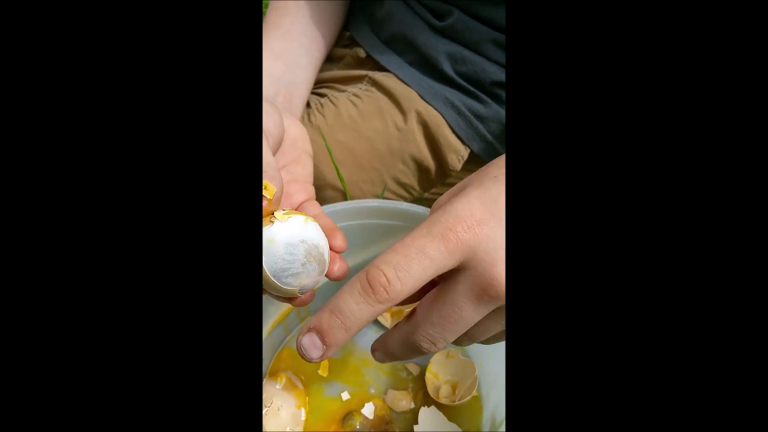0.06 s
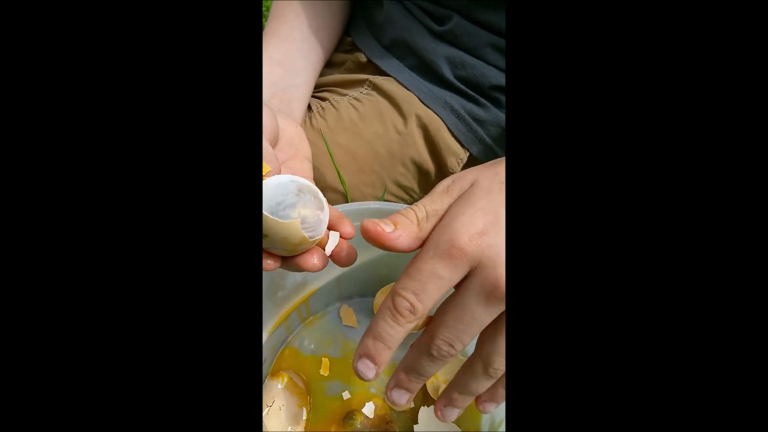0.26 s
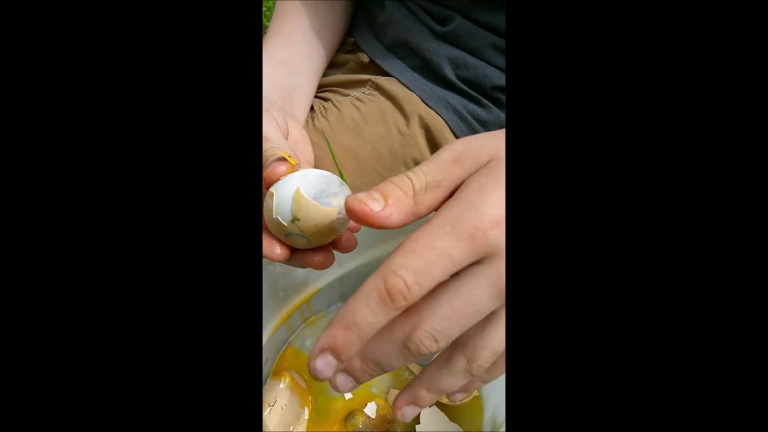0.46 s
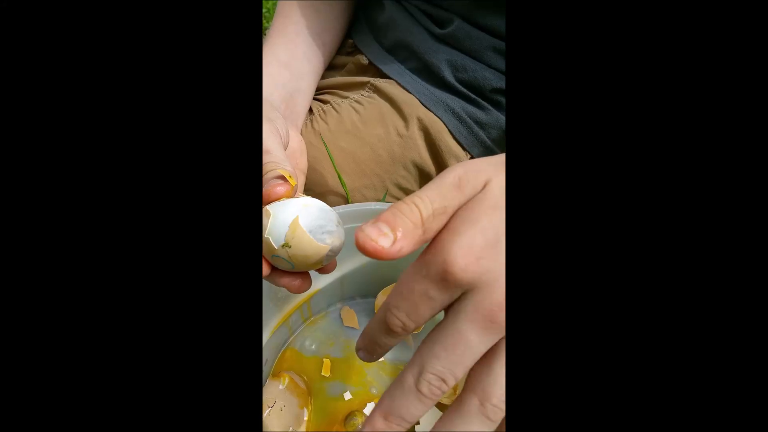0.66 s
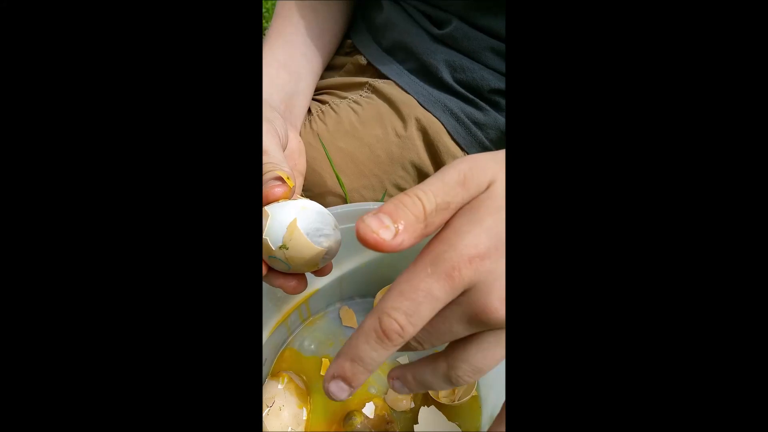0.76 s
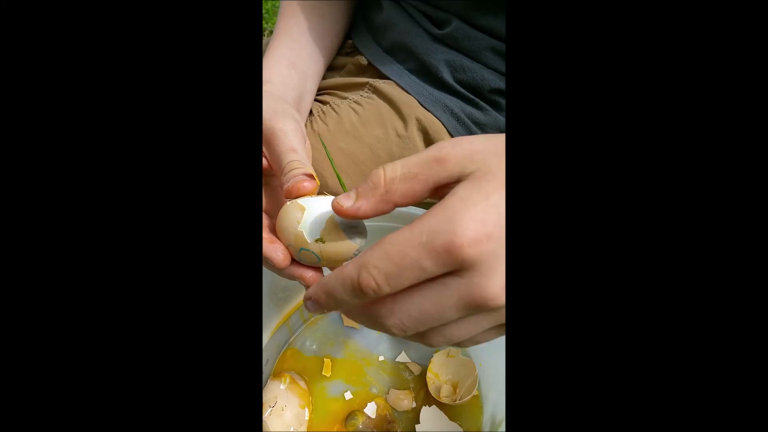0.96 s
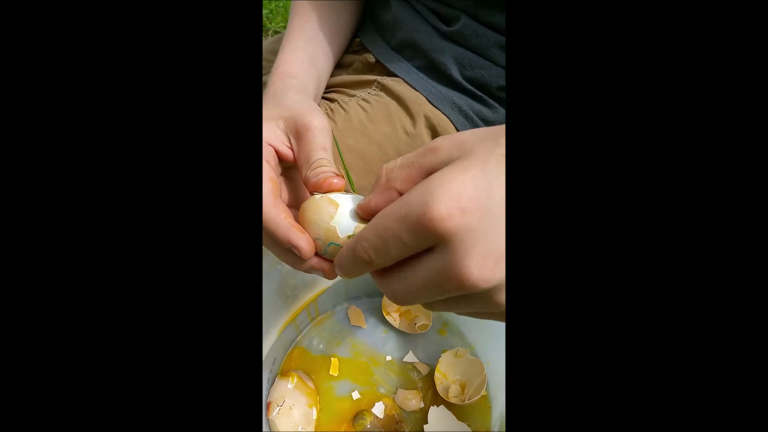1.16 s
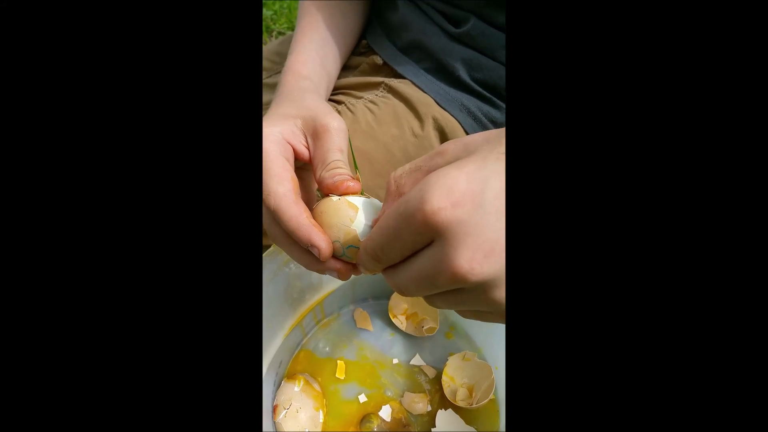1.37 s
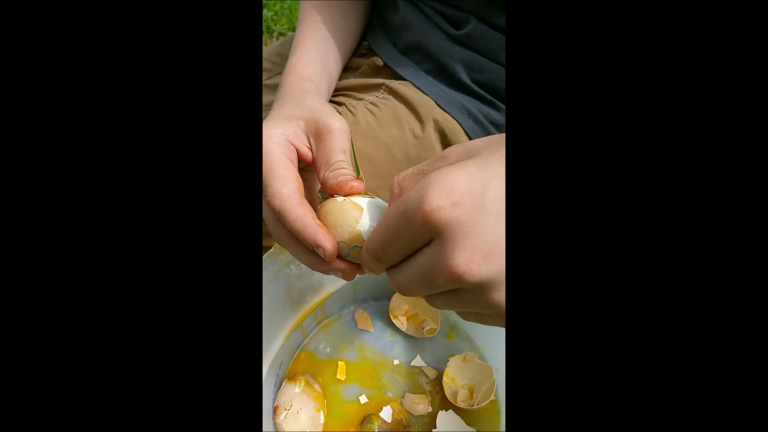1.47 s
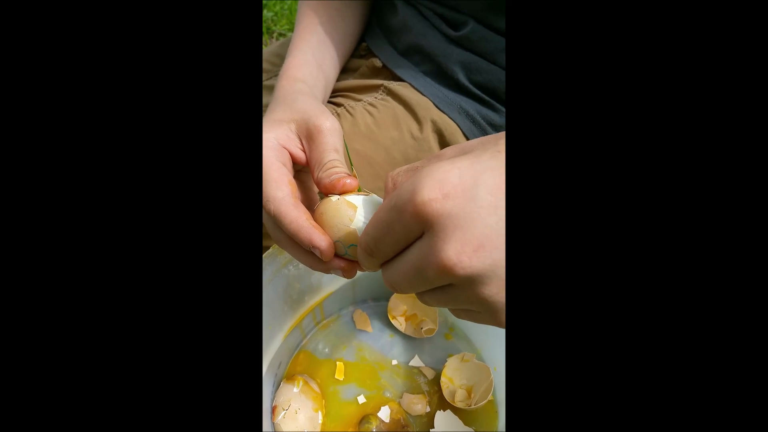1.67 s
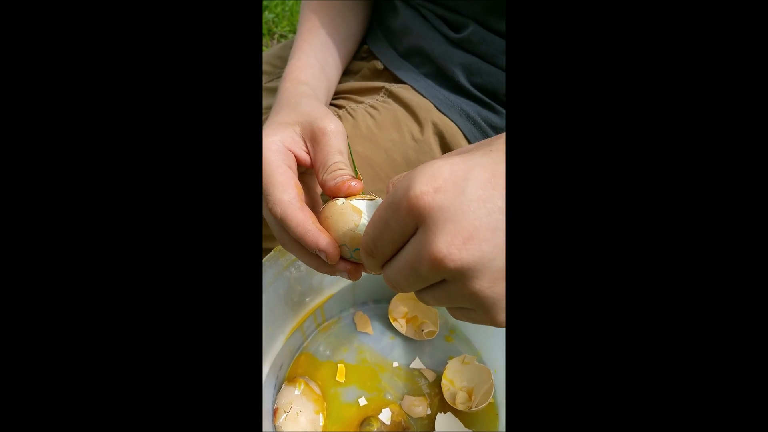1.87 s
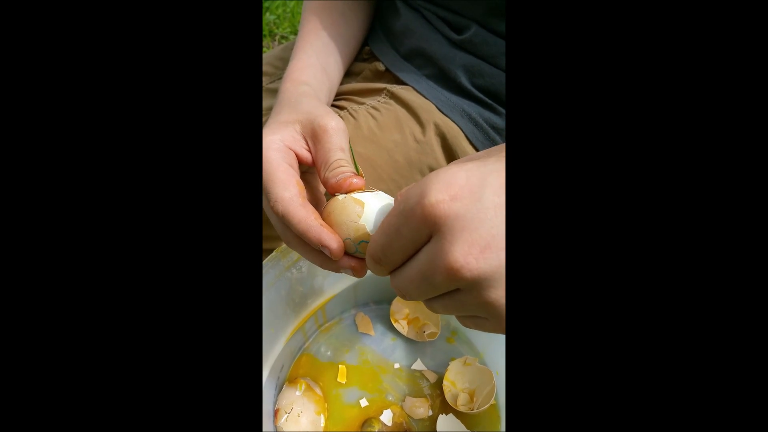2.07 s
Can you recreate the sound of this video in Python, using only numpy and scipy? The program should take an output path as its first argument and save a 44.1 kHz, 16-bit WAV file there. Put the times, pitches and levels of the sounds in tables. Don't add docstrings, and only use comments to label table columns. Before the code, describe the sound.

Egg peeling, very close and dry. At 0.23 s a shell piece hits a hollow plastic bucket with a loud double knock, then bounces and rattles more faintly until about 0.55. At 0.9 a flake tears off in a sharp brittle crackle, followed by sparse faint ticks to 1.5. Finer, brighter cracks come from 1.86 to 2.1. Far behind: low engine rumble, rustling leaves, faint bird chirps, one slight squeak around 0.7.

```python
import sys
import numpy as np
from scipy import signal
from scipy.fft import rfft, irfft
from scipy.io import wavfile
from scipy.ndimage import uniform_filter1d

SR = 44100
rng = np.random.default_rng(int(sys.argv[2]) if len(sys.argv) > 2 else 0)


def to_linear_factor(level_db):
    exponent = np.asarray(level_db, float) / 20
    return 10 ** exponent


def master(y):
    cut = np.clip(np.atleast_2d(y).T, -1, 1)
    pcm = np.round(cut * 32767)
    wavfile.write(sys.argv[1], SR, pcm.astype(np.int16))


N = 92610
HZ = np.fft.rfftfreq(N, 1 / SR)
BOTH_SIDES = np.array([[1], [-1]])


def curve(table, hz):
    table = np.array(table)
    return np.interp(np.log(np.maximum(hz, 1)), np.log(table[:, 0]), table[:, 1])


def ring(modes, phase=0., size=3000):
    hz, db, t60 = np.array(modes, float).T[:, :, None]
    t = np.arange(size) / SR
    decay = np.exp(-np.log(1000) * t / t60)
    return (to_linear_factor(db) * np.sin(2 * np.pi * hz * t + phase) * decay).sum(0)


def push(size):
    contact_s = 0.00021
    return 1 - np.exp(-np.arange(size) / SR / contact_s)


def walk(rate_hz):
    k = int(SR / rate_hz)
    steps = np.repeat(rng.standard_normal(N // k + 1), k)
    w = uniform_filter1d(uniform_filter1d(steps, k), k)[:N]
    return w / w.std()


def bell(centre_hz, width_hz):
    return np.exp(-.5 * ((HZ - centre_hz) / width_hz) ** 2)


def band(shape):
    x = irfft(rfft(rng.standard_normal((2, N))) * shape, N)
    return x / x.std()


def add(out, start_s, x):
    i = int(start_s * SR)
    out[:, i:i + x.shape[1]] += x[:, :N - i]


def peak(x, db):
    return x * to_linear_factor(db) / np.abs(x).max()


def pair(shape):
    alike = .93 / (1 + (HZ / 580) ** 2)
    mid, side = rfft(rng.standard_normal((2, N))) * shape * np.sqrt([1 + alike, 1 - alike])
    left = (mid + side) * to_linear_factor(0.757 * alike)
    right = (mid - side) / to_linear_factor(0.78 * alike)
    return irfft(np.array([left, right]), N)


# pitch_hz, level_db (per Hz)
AIR_SPECTRUM = [(20, -15), (100, -4), (200, -13.5), (330, -18.5), (800, -23.5), (2500, -33), (7000, -34.5),
                (8200, -39), (16500, -36)]
# pitch_hz, width_hz, level_db
ENGINE_DRONES = [(80.74, 28, -66.5), (130.6, 9.9, -69.5), (168.3, 4.8, -74), (284, 11, -76), (428, 12, -77),
                 (470, 29, -78.5)]


def air():
    out, top_hz, level_db = 0, 15900, -63.5
    for centre in 22 * 2 ** np.arange(0, 10.):
        octave = np.cos(np.pi / 2 * np.log2(np.maximum(HZ, 1) / centre).clip(-1, 1))
        shape = octave * (HZ < top_hz) * to_linear_factor(curve(AIR_SPECTRUM, HZ))
        out = out + pair(shape) * to_linear_factor(0.54 * walk(2.97))
    out = out * to_linear_factor(level_db) / out.mean(0).std()
    for hz, width_hz, db in ENGINE_DRONES:
        drone = pair(bell(hz, width_hz))
        out = out + drone * to_linear_factor(db + 1.83 * walk(3.42)) / drone.mean(0).std()
    return out


# time_s, level_db
LEAF_SWELL = [
    (0.0, -74.5),
    (1.98, -80),
    (2.1, -93),
]


def leaves():
    hump_hz, width_octaves = 2200, 0.67
    rustle = band(np.exp(-.5 * (np.log2(np.maximum(HZ, 1) / hump_hz) / width_octaves) ** 2))
    swell_db = np.interp(np.arange(N) / SR, *np.array(LEAF_SWELL).T)
    return rustle * to_linear_factor(swell_db - 0.5)


# pitch_hz, level_db, t60_s
SHELL_MODES = [(2100, -8, 0.0055), (2500, -4, 0.015), (3220, -4, 0.00491), (3770, -2.5, 0.00367),
               (4592, -4.5, 0.0012), (5300, 3, 0.0034), (6000, -3.5, 0.0045), (7070, 3.5, 0.0044),
               (7650, -7.5, 0.004), (8950, 4, 0.0058), (10160, 3, 0.0033), (11500, 3, 0.003),
               (13500, -4, 0.0062), (15140, -6.5, 0.00505)]


def snaps(burst_s, tilt_db):
    t = np.arange(800) / SR
    loudness_db = 8.5 * rng.standard_normal(800).clip(-2, 1.5)
    size = rng.standard_normal(800) * to_linear_factor(loudness_db) * (rng.random(800) < 0.27)
    size[0] = 5
    grit = 0.086 * np.exp(-t / 0.0026)
    burst = size * (np.exp(-(t / max(burst_s, .0002)) ** 2) + grit)
    modes = np.array(SHELL_MODES, float)
    modes[:, 0] *= 1 + .05 * rng.standard_normal(len(modes))
    octaves = np.log2(modes[:, 0] / modes[0, 0])
    modes[:, 1] += 4 * rng.standard_normal(len(modes)) + tilt_db * octaves
    turn = (1 + 0.33 * rng.standard_normal((len(modes), 1))) * -.5 * np.pi / 2
    return np.array([np.convolve(burst, ring(modes, p, size=700)) for p in (turn, -turn)])


# pitch_hz, level_db, t60_s
BUCKET_MODES = [(534,0.5,0.027),(1106.4,1.5,0.024),(1785,-9.5,0.019),(2068,-18,0.023),(2538,-8.5,0.019),(2990,-18,0.027),(3210,-12.5,0.0092),(3660,-17.5,0.029),(782,-8.5,0.015),(407,-10.5,0.011),(635,-6.5,0.026),(926,-5,0.015),(1450,-11.5,0.016)]
# start_s, peak_db, deep_modes_db, rattle_db
BOUNCES = [(0.2289,-8.5,8,-2),(0.2318,-25,-9,6.5),(.2410,-6,-8.5,-8),(.2450,-16.5,8,3.5),(.3447,-33,-2,-1),(0.3539,-23.5,-10.5,-4.5),(0.3651,-20,-7.5,1.5),(0.3788,-33,-17,-2.5),(.3950,-42,0,0),(.4030,-28,0.5,-7.5),(.4052,-33.5,-22,1),(.4180,-36.5,-1,-15),(0.4235,-33.5,-1.5,-23.5),(.4350,-33,-10,-2),(0.441,-38,-1,-6),(.4695,-40.5,4,-30),(0.4971,-46.5,0,-30),(0.5092,-44,10,-32),(0.5231,-52.5,-7,-28),(.535,-55.5,-4,-26),(0.546,-54,-27,-24)]


def drops():
    out = np.zeros((2, N))
    rocking, thud = (159.5, -7, 0.041), (300, -20.5, 0.014)
    for start_s, db, deep_db, rattle_db in BOUNCES:
        modes = np.array(BUCKET_MODES + [rocking, thud])
        modes[[0, -6, -5, -2, -1], 1] += deep_db - 2.5
        modes[:, 0] *= 1 + 0.029 * rng.standard_normal(len(modes))
        modes[2:, 1] += 3 * rng.standard_normal(len(modes) - 2)
        turn = 0.32 * rng.standard_normal((2, len(modes), 1)) * modes[:, :1] / 1100
        wall = -np.array([ring(modes, p) * push(3000) for p in turn])
        add(out, start_s, peak(wall, db))
        add(out, start_s, peak(snaps(0.002, -0.5), db + rattle_db))
    return out


# start_s, length_s, rms_db, tilt_db (per octave)
GRINDING = [(.2395, 0.003, -35, 11), (0.346, 0.052, -48, -13), (0.388, 0.066, -55.5, -18),
            (0.872, 0.0062, -72.5, -0.5), (0.8967, 0.012, -41.5, -5.5), (0.917, 0.0082, -50.5, -5),
            (0.9291, 0.011, -47.5, -24), (1.8642, 0.012, -40, 26), (1.882, 0.007, -57, 8.5),
            (1.904, 0.018, -71, -1), (2.037, .004, -68, 0), (2.053, 0.01, -72, -5),
            (2.065, 0.014, -50.5, -4.5), (2.08, 0.015, -53.5, 1.5), (2.091, 0.0085, -54.5, 5)]


def crunch():
    out = np.zeros((2, N))
    low_modes = [(1160, -14.5, 0.014), (1520, -2, 0.0056)]  # Hz, dB, t60 s
    for start_s, length_s, db, tilt_db in GRINDING:
        hit, loudness, chance = rng.standard_normal((3, int(length_s * SR)))
        grit = hit * to_linear_factor(1.5 * loudness) * (np.abs(chance) < .3)
        grit = grit * np.sin(np.pi * np.linspace(0, 1, len(grit)) ** 0.41).clip(0) ** .9
        modes = np.array(low_modes + SHELL_MODES) * [1, 1, 0.68]
        modes[:, 1] += tilt_db * np.log2(modes[:, 0] / 2000)
        turn = (1 + .3 * rng.standard_normal((len(modes), 1))) * -.5 * np.pi / 2
        x = np.array([np.convolve(grit, ring(modes, p, size=500)) for p in (turn, -turn)])
        add(out, start_s, x * to_linear_factor(db) / x.std())
    return out


# start_s, length_s, from_hz, to_hz, level_db
CHIRPS = [
    (1.70, .02, 5050, 5450, -79),
    (1.72, .015, 5650, 6000, -80),
    (1.693, .027, 3900, 3950, -81),
    (1.765, .014, 5200, 5500, -81),
    (1.778, .02, 5500, 4750, -78),
    (.572, .025, 4150, 4150, -79),
    (1.964, .018, 5350, 5200, -80),
    (1.59, .03, 5500, 4300, -83),
    (1.57, .02, 3600, 3100, -83),
]


def birds():
    out = np.zeros((2, N))
    for start_s, length_s, from_hz, to_hz, db in CHIRPS:
        n = int(length_s * SR)
        phase = 2 * np.pi * np.cumsum(np.linspace(from_hz, to_hz, n)) / SR
        tone = np.sin(phase) * np.hanning(n) ** .5
        add(out, start_s, to_linear_factor(db) * 2 * np.array([tone, tone]))
    return out


# pitch_hz, width_hz, level_db
SQUEAK_PARTIALS = [(1020, 18, -77.5), (4030, 100, -81), (3620, 110, -84)]


def squeak():
    start_s, length_s = .66, .25
    tone = sum(to_linear_factor(db) * band(bell(hz, width_hz))[0] for hz, width_hz, db in SQUEAK_PARTIALS)
    progress = ((np.arange(N) / SR - start_s) / length_s).clip(0, 1)
    return tone * np.sin(np.pi * progress).clip(0) ** .5 * to_linear_factor(3.4 * walk(29.6))


# start_s, peak_db, flake_hz, flake_db, burst_s
TEARING_CRACKS = [(0.8965,-35.5,2380,0,0.0026),(0.8983,-16.5,2130,-11,0.0022),(0.9009,-11.5,1050,-19,0.0026),(0.9029,-36.5,405,10,0.0029),(0.9041,-23.5,3100,-4,0.0025),(0.9084,-23,1470,-11.5,0.0012),(0.9192,-35,2230,3,0.0025),(0.9295,-21,2150,-10,0.0028),(0.9683,-40.5,2200,-27,0.0035),(1.0002,-36.5,1670,-8,0.0062),(1.004,-36.5,1930,-15,0.0038),(1.012,-37.5,1530,-8,0.0029),(1.036,-43.5,1910,-12,0.0042),(1.109,-58.5,2200,3.5,.004),(1.1783,-37,2500,-15.5,0.0071),(1.291,-53.5,8000,-27,0.0028),(1.3264,-49.5,2430,-11.5,0.0086),(1.339,-50.5,2500,-13,0.00308),(1.4039,-48.5,1102,-1.5,0.0051),(1.508,-36.5,3394,-12,0.0062),(1.5304,-52.5,2500,-17.5,0.0062)]
# start_s, peak_db, flake_hz, flake_db, burst_s
THUMB_CRACKS = [(1.8529,-64,2480,4.5,0.0033),(1.8642,-38,2500,-15,0.0058),(1.867,-35.5,2200,-5,0.00067),(1.8693,-30.5,5350,-13.5,0.0011),(1.8695,-31,2260,-3,0.0063),(1.8779,-56,1220,8.5,0.0037),(1.8853,-41,1990,-20.5,0.0082),(1.8904,-25,1290,-36,0.0027),(1.8921,-23,1290,-24,0.0015),(1.896,-39,1380,-21,0.0039),(1.917,-33,2400,-17,0.0047),(1.9924,-22.5,950,-18.5,0.00092),(1.9933,-26,5300,-5,0.0031),(2.0430,-34.5,2410,-13,0.0026),(2.0660,-41,1080,3.5,0.0028),(2.0715,-44,6000,-5.5,0.003),(2.0788,-37,2900,-22,0.0013),(2.0835,-38,5300,-13,0.002),(2.0844,-31,3170,-9,0.0022),(2.0918,-34,6000,-6,.003)]


def cracks():
    out = np.zeros((2, N))
    for events, tilt_db in ((TEARING_CRACKS, 2), (THUMB_CRACKS, 7.5)):
        for start_s, db, hz, flake_db, burst_s in events:
            add(out, start_s, peak(snaps(burst_s, tilt_db), db))
            t60 = 0.004 * (1500 / hz) ** 1.55 + 0.0035
            modes = [(hz, 0, t60), (hz * 0.655, -10, t60 * 0.69), (hz * 0.53, -5, t60 * 0.26)]
            flake = push(1500) * ring(modes, size=1500)
            add(out, start_s, peak(-np.array([flake, flake]), db + flake_db))
    return out


def scatter(hits):
    level_db, t60_s, top_hz = -18, 0.0349, 3500
    t = np.arange(4000) / SR
    tail = signal.lfilter(*signal.butter(1, top_hz, fs=SR), rng.standard_normal((2, 4000)))
    tail = tail * np.exp(-np.log(1000) * t / t60_s)
    tail = tail / np.sqrt((tail ** 2).sum(1, keepdims=True))
    return hits + to_linear_factor(level_db) * signal.fftconvolve(hits, tail, axes=1)[:, :N]


# pitch_hz, level_db
PHONE_COLOUR = [(300, -0.5), (2500, 0), (7000, 0.5), (8400, -5), (12500, -1.5), (14800, -3.5),
                (16500, -6.5)]
# pitch_hz, left_minus_right_db
LEFT_RIGHT = [(200, 0.5), (700, 2.5), (1300, -0.5), (2400, 3), (4400, -10.5), (6500, -10), (9500, -1),
              (15000, -8.5)]


def microphones(hits):
    lag_s = .00001
    colour = to_linear_factor(curve(PHONE_COLOUR, HZ) + BOTH_SIDES * curve(LEFT_RIGHT, HZ) / 2)
    delay = np.exp(-1j * np.pi * HZ * lag_s * BOTH_SIDES)
    return irfft(rfft(hits) * colour * delay, N)


def scene():
    outdoors = air() + leaves() + birds() + squeak()
    hits = drops() + crunch() + cracks()
    hits = signal.sosfilt(signal.butter(2, 391, 'high', fs=SR, output='sos'), hits)
    return microphones(scatter(hits)) + outdoors


def top_cut(x):
    return signal.sosfilt(signal.butter(12, 16820, fs=SR, output="sos"), x)


def record(dry):
    top_hz = 16300
    mix = signal.sosfilt(signal.ellip(10, .3, 80, top_hz, fs=SR, output='sos'), dry)
    return top_cut(mix)


dry = scene()
out = record(dry)
master(out)
```